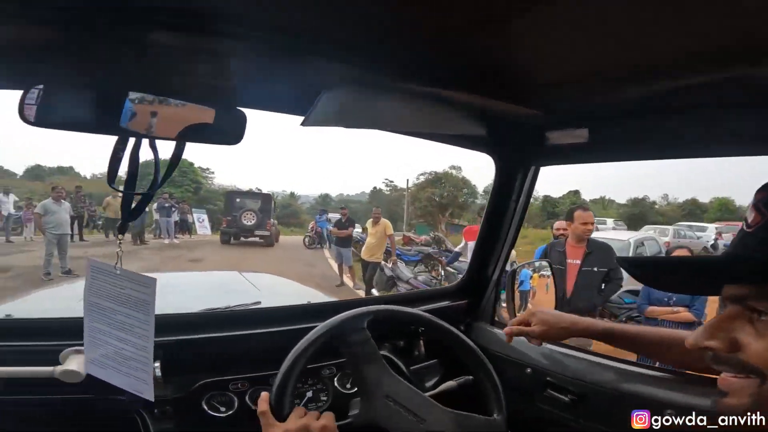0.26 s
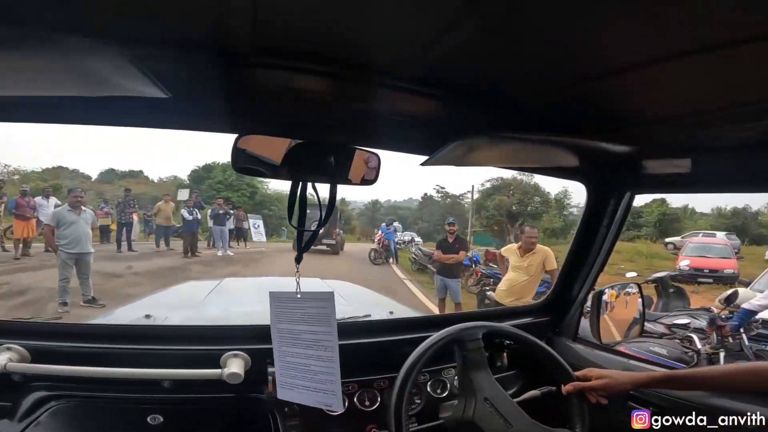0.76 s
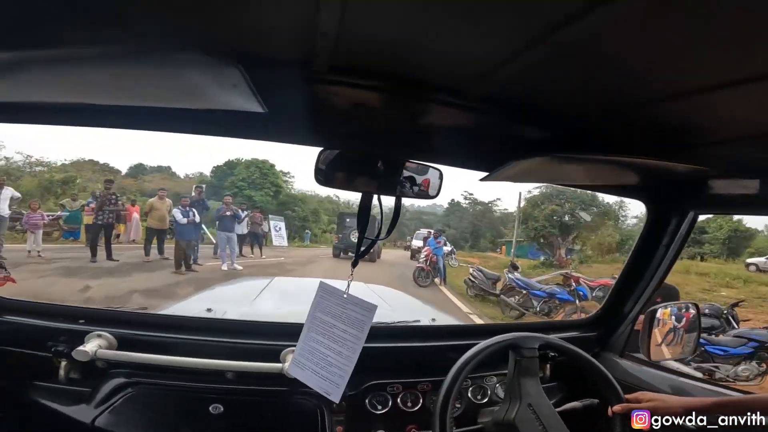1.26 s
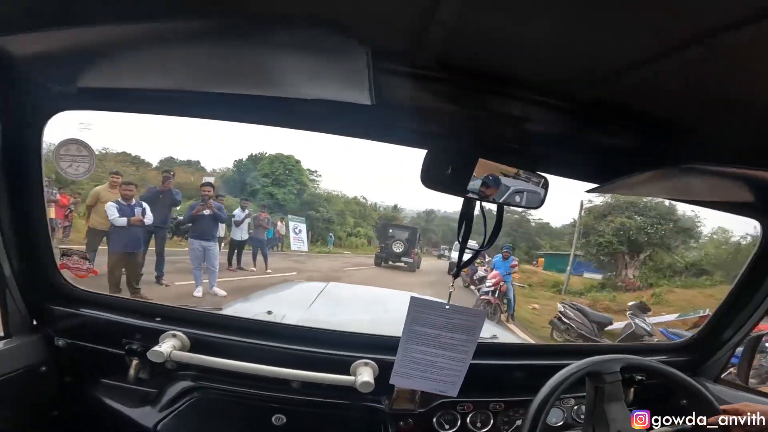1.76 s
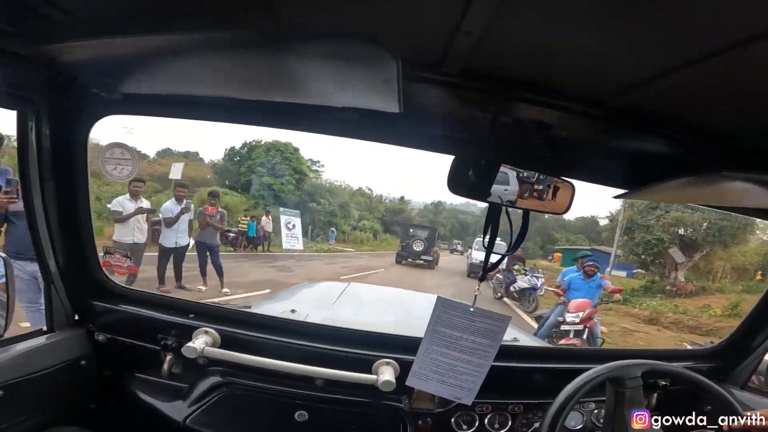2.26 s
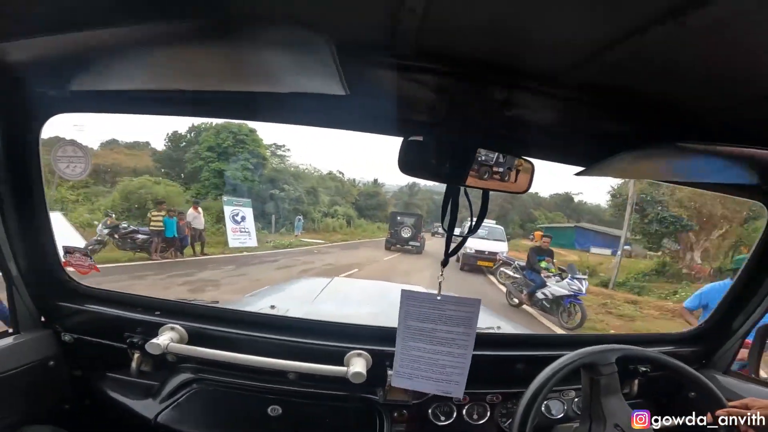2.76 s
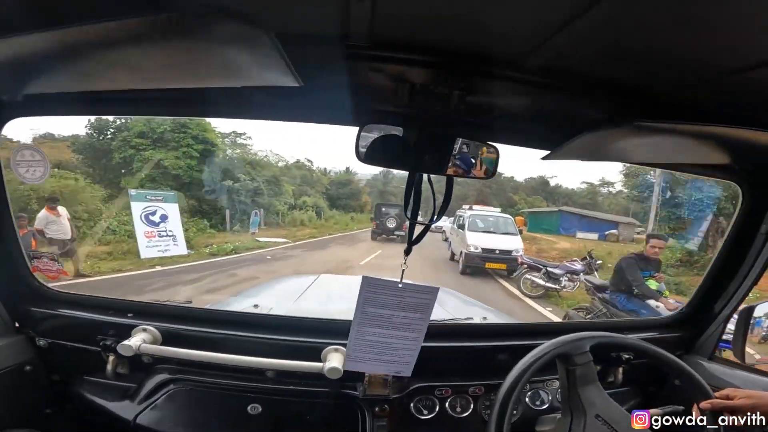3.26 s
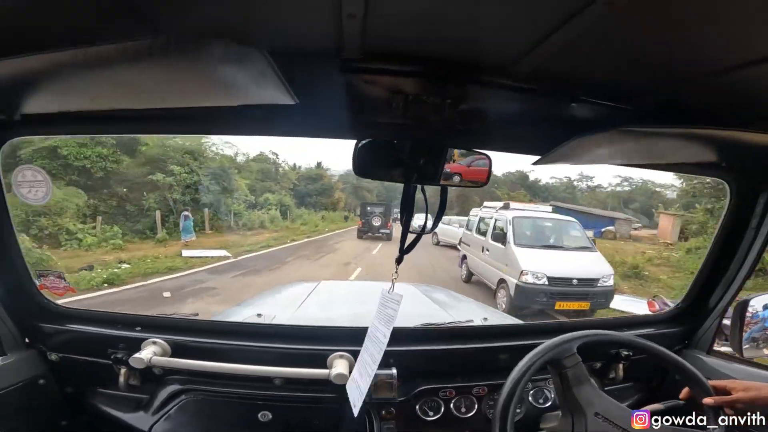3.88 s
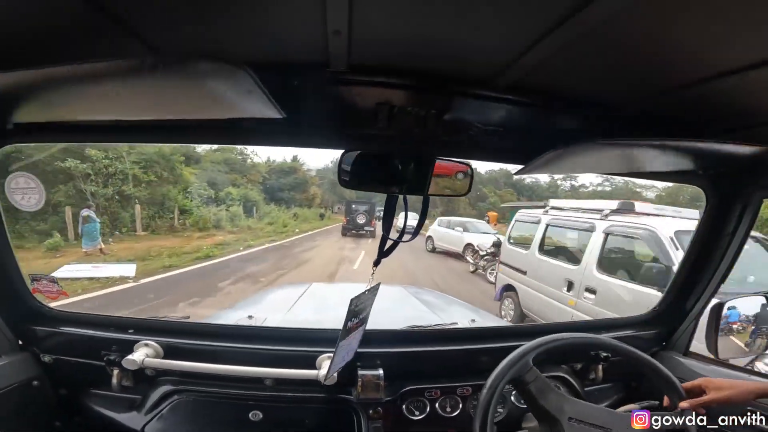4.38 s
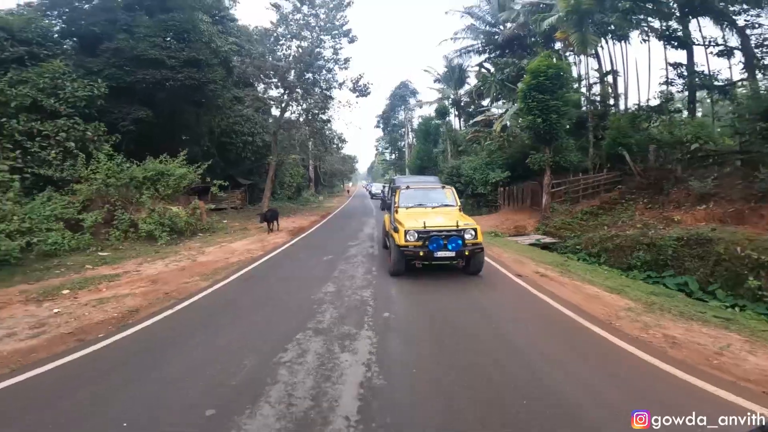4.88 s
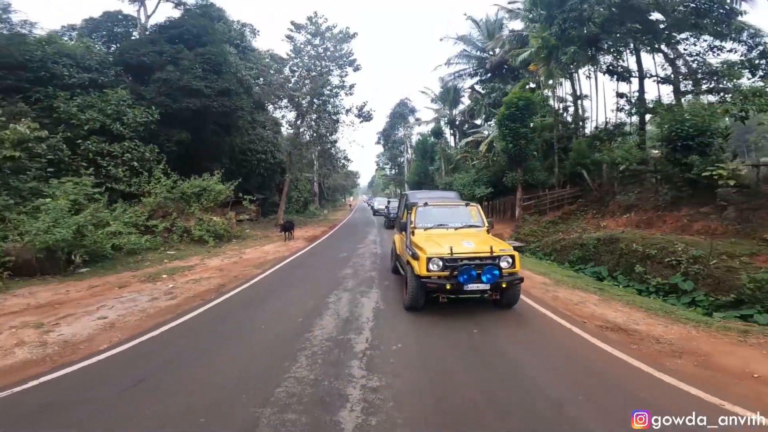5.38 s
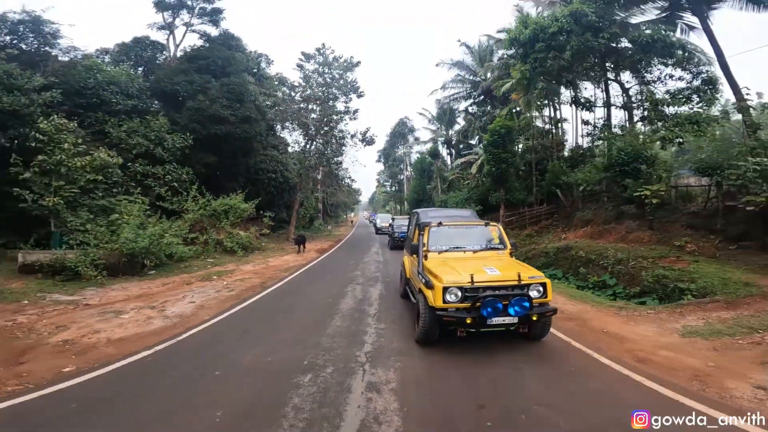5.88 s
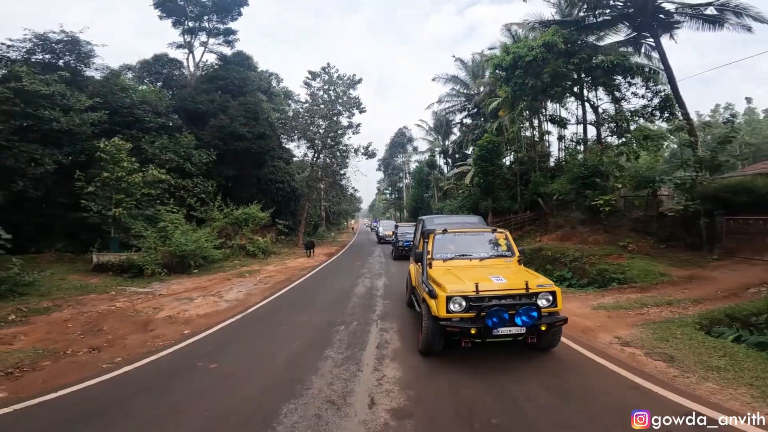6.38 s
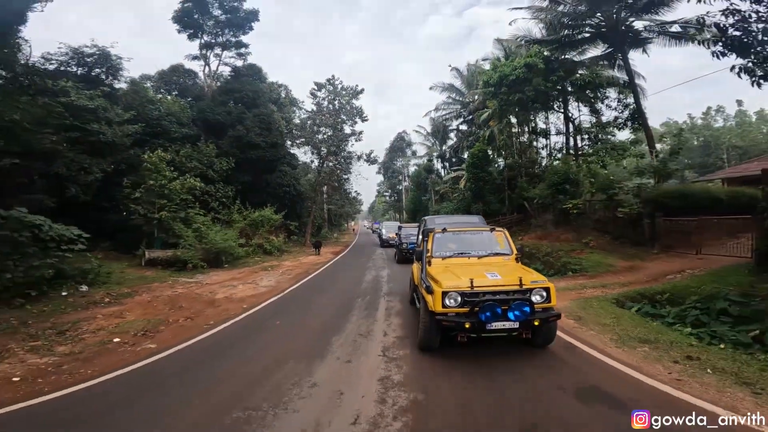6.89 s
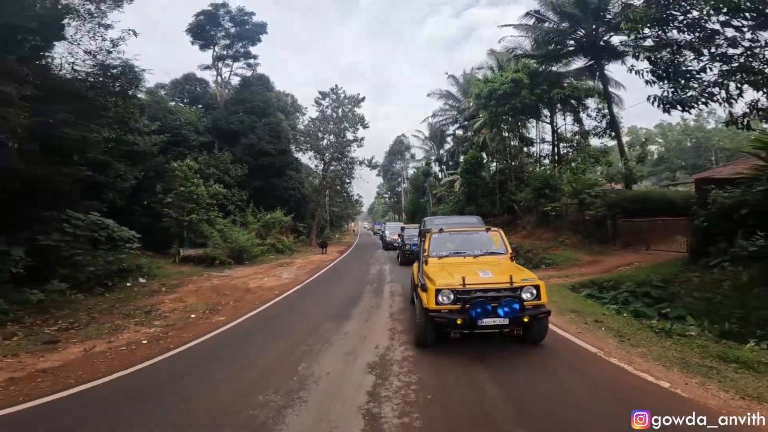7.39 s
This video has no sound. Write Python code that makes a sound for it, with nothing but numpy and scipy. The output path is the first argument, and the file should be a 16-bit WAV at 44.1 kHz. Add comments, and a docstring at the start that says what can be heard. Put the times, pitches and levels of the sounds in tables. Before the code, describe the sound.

Off-road vehicle pulls away with a droning cabin boom and clatter, stops dead, then open-road wind, tyre roar and a light rattle gradually build.

```python
"""An off-road vehicle's engine, heard inside the cab: it pulls away, revs up, sags in a gear change, pulls again.
Its firing tone booms in the cabin; firing pulses and noise ring panels, growl and clatter; trim ticks and creaks.
The cab stops dead. After an instant of silence the scene changes to the open road, heard from a moving vehicle
ahead of a convoy: a low exhaust close by and engine hums from wavering tones, air buffeting the microphone
and tyre roar from coloured noise, all swelling or shifting while a loose fitting rattles in resonant bursts."""
import sys
import numpy as np
from scipy import signal
from scipy.fft import rfft, irfft, next_fast_len
from scipy.io import wavfile
from scipy.ndimage import uniform_filter1d, map_coordinates

SR = 44100
rng = np.random.default_rng(int(sys.argv[2]) if len(sys.argv) > 2 else 0)


def wrap_up_sound(samples):
    """Save the sound to the file named by the first command line argument, as 16-bit audio."""
    columns = np.atleast_2d(samples).T
    # keep every value between -1 and 1, then stretch to whole-number steps
    tamed = np.clip(columns, -1, 1)
    steps = np.round(tamed * 32767).astype(np.int16)
    wavfile.write(sys.argv[1], SR, steps)


N = 336924
TIME = np.arange(N) / SR  # s

# In the cab. Engine speed: time_s, firing_rate_hz
ENGINE_SPEED = [(0, 51.8), (.2, 52.76), (.4, 56.64), (.52, 59.15), (.68, 60.78), (1, 67.66), (1.4, 76.26),
                (1.53, 74.4), (1.8, 61.75), (2.02, 55.15), (2.26, 48.06), (2.82, 45.26), (3.4, 50.97),
                (3.95, 51.9), (4.27, 54.14), (4.48, 59.23), (4.62, 58), (4.79, 59.76)]
# Load on the engine: time_s, load_db over a steady pull
ENGINE_LOAD = [(0, 5), (.16, 0), (.3, 0), (1, 4), (1.4, 4), (1.8, -4.5), (2.1, -5), (2.6, -0.5),
               (3.3, -1.5), (4.05, -3.5), (4.79, 4.5)]
# The boom falls away: centre_s, half_length_s, depth_db
BOOM_DIPS = [(.56, 0.081, 14), (1.39, 0.07, 21), (1.99, 0.086, 16.5), (2.38, 0.14, 4), (3.35, 0.019, 15),
             (3.83, .035, 7), (3.95, 0.93, 3), (4.24, 0.073, 4.5), (4.61, 0.083, 14)]
# The boom's octave: time_s, level_db
BOOM_OCTAVE = [(0, -24), (.47, -36), (.53, -20.5), (.66, -16), (.85, -22.5), (1.36, -22), (1.53, -42),
               (1.7, -28.5), (1.93, -33.5), (2.05, -20.5), (2.2, -29.5), (3, -35.5), (3.6, -25),
               (4.05, -31), (4.2, -19), (4.35, -37.5), (4.48, -22.5), (4.61, -20.5), (4.73, -35),
               (4.79, -19)]
# Answer of the cab's air to the third overtone: pitch_hz, level_db at a steady pull
CAB_AIR = [(135, -27.5), (150, -36), (175, -42.5), (230, -60)]
# Spectrum of the cabin's shaking: frequency_hz, relative_level_db
SHAKE_SPECTRUM = [(60, -36), (110, -1.5), (145, 11), (200, 1.5), (290, 4.5), (350, -0.5), (420, -12.5),
                  (490, -19.5), (800, -76.5)]
# The shaking swells and eases: centre_s, half_length_s, change_db
SHAKE_SWELLS = [(.15, .2, 0), (.7, 0.28, 3.5), (1.9, .45, 1.2), (2.8, .3, 0), (3.1, .1, 0.5),
                (3.65, 0.16, -5)]
# Overtones of the firings that ring in the cabin: multiple of firing rate, relative_level_db
CABIN_OVERTONES = [(2.25, -0.5), (2.5, -2.5), (4, -17), (5.3, -7), (6, -4.5), (6.9, -2.5), (9, 0.5),
                   (10.5, 0.5), (12.3, 0)]
# The cabin's response to them: frequency_hz, response_db
CABIN_RESPONSE = [(70, 5), (130, -3), (210, 0.5), (290, -1.5), (345, -5), (400, -8.5), (480, -19),
                  (590, -9), (660, -17), (740, -12), (950, -17.5), (1300, -23)]
# Resonances of the cabin panels: centre_hz, width_hz, relative_level_db
PANEL_MODES = [(604, 44, 2), (724, 16, 6), (803.6, 22, 7), (932, 52, 3), (1240, 74, -0.5), (1558, 18, 1.5),
               (1974, 55, -6.5)]
# Spectrum of the engine's growl: frequency_hz, relative_level_db
GROWL_SPECTRUM = [(280, -12), (420, 10), (480, 2.5), (590, 5.5), (667, 2), (740, 4), (900, 1), (1060, -0.5),
                  (1280, -1), (1500, -1.5), (1750, -22.5), (2600, -62.5)]
# Spectrum of the engine's clatter: frequency_hz, relative_level_db
CLATTER_SPECTRUM = [(1100, -39.5), (1600, 2), (2300, -2), (3000, -4), (3700, -12.5), (4400, -15.5),
                    (5200, -18), (6300, -23.5), (7300, -32), (8500, -33), (10500, -51), (12000, -39.5),
                    (14000, -41), (15500, -62)]
# Throaty resonances as the engine takes up the drive: centre_hz, width_hz, relative_level_db
RASP_MODES = [(644, 33, 4), (804, 95, -1), (974, 32, -1.5), (1240, 69, -4.5)]
# The drive line's drone: time_s, pitch_hz, level_db
DRIVE_LINE = [(0, 60, -40.5), (2.2, 76.56, -38), (2.65, 78.46, -29), (2.85, 78.58, -22.5),
              (3.1, 81.47, -27), (3.4, 85.58, -23), (3.65, 89.05, -24.5), (3.9, 92.9, -19),
              (4.02, 93.3, -30), (4.35, 94.5, -22), (4.8, 90.4, -33)]
# Spectrum of the chassis thumping: frequency_hz, relative_level_db
THUMP_SPECTRUM = [(10, -10.5), (22, 1.5), (32, -4), (45, 2.5), (80, 3), (130, -0.5), (200, -16),
                  (400, -89.5)]
# Rougher and smoother stretches of road: centre_s, half_length_s, change_db of thumping
ROAD_BUMPS = [(.4, 0.64, -3), (1.45, 0.17, 5.5), (2.5, 0.17, 3.5), (4.6, 0.32, 4.5)]
# Ticks, buzzes, creaks and squeaks of trim: start_s, level_db before its envelope, centre_hz, width_hz, t60_s
TRIM_BURSTS = [(.01, -53.5, 4980, 40.7, 0.75), (.01, -46, 3620, 45, .8), (1.965, -42, 4000, 995, 0.076),
               (1.969, -57, 6940, 605, 0.082), (3.435, -62.5, 13160, 1297, 0.051),
               (3.437, -58.5, 8700, 995, 0.062), (2.37, -29, 510, 260, 0.24), (3.05, -25, 320.9, 40, 0.26),
               (3.19, -21.5, 325, 40, 0.14), (3.639, -25, 599.3, 70, 0.15), (3.775, -51.5, 4800, 109, 0.23),
               (3.815, -50, 4630, 128.3, 0.2)]
# The engine sings at full throttle: multiple of firing rate, relative_level_db
WHINE_OVERTONES = [(8.25, -4.5), (10.27, 5.5), (11.5, -8.5), (12.3, -11), (13.05, -6.5), (13.7, -16),
                   (14.3, 4), (17.95, -5.5), (19.08, 3.5), (20, -3.5)]
# Bands of the thin hiss: centre_hz, width_hz, relative_level_db
HISS_BANDS = [(2850, 70, -6.5), (3180, 180, 3.5), (3400, 110, -6.5)]

# On the open road. Spectrum of air on the microphone: frequency_hz, relative_level_db
BUFFET_SPECTRUM = [(8, -16), (25, -19.5), (45, 0.5), (85, 4.5), (125, -8.5), (200, -45), (400, -80.5)]
# Spectrum of the road noise's low body: frequency_hz, relative_level_db
BODY_SPECTRUM = [(65, -26.5), (110, 1), (160, 2), (220, 0.5), (265, -7.5), (365, -9.5), (400, -13),
                 (440, -12.5), (520, -27), (750, -75)]
# Spectrum of the tyres' roar: frequency_hz, relative_level_db
TYRE_SPECTRUM = [(280, -28), (480, -1), (575, -0.5), (720, -2.5), (805, -1), (900, -2), (1150, -5.5),
                 (1300, -4.5), (1440, -2), (1620, -5.5), (2100, -8), (2430, -11.5), (2950, -10),
                 (3400, -23.5), (4600, -51.5)]
# Spectrum of the fine treble spray: frequency_hz, relative_level_db
SPRAY_SPECTRUM = [(2300, -30.5), (3200, 2.5), (3900, -2.5), (4500, -4.5), (5200, -7), (6000, -12.5),
                  (7000, -18), (8300, -22.5), (9200, -29), (10500, -61), (12500, -38.5), (15000, -33.5)]
# The leading vehicle's exhaust: time_s, firing_rate_hz, level_db, octave_level_db
EXHAUST_SPEED = [(4.85, 24.64, -43.5, -51), (5.7, 24.27, -35, -38), (6.4, 24.54, -32.5, -39),
                 (6.66, 26.27, -28, -42), (6.82, 29.1, -33, -25.5), (6.96, 30.2, -26.5, -21),
                 (7.13, 33.83, -24, -41), (7.27, 36.7, -27, -22), (7.48, 35.88, -25, -20),
                 (7.64, 38, -28, -32)]
# The exhaust's upper overtones: multiple of firing rate, relative_level_db
BURBLE_OVERTONES = [(3, -5), (4, 0.5), (5, -5), (6, -5.5), (7, -6), (9, -12.5)]
# The convoy's engines: time_s, pitch_hz, level_db
CONVOY_HUM = [(4.9, 81.44, -38), (5.1, 83.7, -41.5), (5.4, 84.24, -39.5), (5.8, 81.17, -55),
              (6.35, 81.27, -49), (6.55, 80.63, -31), (7, 78.9, -29.5), (7.2, 82.1, -42), (7.6, 83, -36)]
# A steady-pitched low drone under the convoy: time_s, level_db
ROAD_DRONE = [(5.2, -45), (5.8, -36), (6.4, -36.5), (7.1, -26), (7.64, -25)]
# Hum of tyre tread: time_s, pitch_hz
TREAD_PITCH = [(4.85, 216), (5.7, 229.6), (7.35, 228.2), (7.64, 209.7)]
# The leading vehicle's transmission sings: pitch_hz, level_db before the swell
GEAR_TONES = [(399, -56.5), (578, -68.5), (798, -65), (2480, -76)]
# Modes of the loose fitting, lowest first: centre_hz, width_hz, relative_level_db
FITTING_MODES = [(2990, 130, 1), (3860, 100, 11), (5000, 220, -3), (6630, 240, -16), (8060, 170, -20),
                 (8350, 170, -20.5), (9200, 250, -28.5)]
# The fitting trembles harder: centre_s, half_length_s, extra_db
TREMBLES = [(5.65, 0.2, 9), (6.9, .4, 3)]
# The fitting knocks, levels before the envelope: start_s, lowest_mode_db, upper_modes_db, click_db
KNOCKS = [(5.478, -49, -53, -64.5), (5.58, -50, -46, -61), (5.684, -54, -51.5, -58),
          (5.793, -45.5, -51, -63), (6.025, -48, -60, -52), (6.153, -55, -57, -59), (6.288, -62, -53, -64),
          (6.599, -58, -49, -56), (6.763, -57, -49, -58), (6.935, -57, -47, -55.5),
          (7.111, -56, -44.5, -53), (7.291, -48, -40, -43.5), (7.477, -53, -48, -48.5)]
# Spectrum of the dry click: frequency_hz, relative_level_db
CLICK_SPECTRUM = [(1500, -7.5), (3500, 8), (6500, -2.5), (8000, -2.5), (9500, -15.5), (11000, -39),
                  (15000, -32)]

# Each _GROWS of the cab is in dB per dB of load, its _DB the level at a steady pull
BOOM_DB, AIR_GROWS = -14.5, 0.55  # the boom outside its dips
SHIFT_S = 2.1  # from here, in the higher gear, the engine can labour
LUG_HZ, LUG_WIDTH_HZ, LUG_ROUGH = 49, 7.7, 0.078  # it labours around this firing rate; share of stumbling
SHAKE_DB, SHAKE_GROWS = -32.5, 0.24  # before pull, bumps and swells
BUMP_SHAKE = 0.74  # dB of cabin shake per dB of thumping
OVERTONE_DB = -35.5  # while the engine pulls, before the cabin's shake changes
COAST_HZ_PER_S, COAST_DB = 14, 12  # fall of firing rate with the throttle shut; the overtones' loss
GROWL_DB, GROWL_GROWS = -34, 0.88
CLATTER_DB, CLATTER_GROWS = -43, 1
PULL_START_S, PULL_END_S, PULL_RAMP_S = 0.42, 1.395, 0.12  # the throttle is held wide open
PULL_FAN_DB, PULL_SHAKE_DB = 15, 0.5  # what that adds to the fan and the cabin's shaking
FAN_DB = -51.5  # at light throttle, off resonance
FAN_PEAK_HZ, FAN_WIDTH_HZ, FAN_PEAK_DB = 348.3, 25, 12  # the panel that the fan's tone rings
RASP_DB, RASP_S, RASP_LENGTH_S = -34.5, 0.1, 0.17  # peak level, centre, half length
CHASSIS_DB = -23.5  # thumping between bumps
TRIM_RISE = 0.11  # rise time of a burst as a share of its t60
WHINE_DB = -49.5  # reference for its overtones at wide open throttle
HISS_DB, HISS_S, HISS_LENGTH_S = -47.5, 2.6, 0.16  # peak level, centre, half length
HISS_SKIRT_S, HISS_SKIRT_SHARE = 0.55, 0.36  # half length and share of its fainter, longer skirt

CUT_S, CUT_LENGTH_S = 4.793, .00005  # the cab ends
FADE_S, FADE_LENGTH_S, FADE_POWER = 4.835, 0.29, 1.5  # the open road fades in
SWELL_S, SWELL_DB_PER_S = 5.426, 6  # road noise grows from here as the vehicle gathers speed
# Each _GROWS of the road is in dB per dB of swell, its _DB the level before the swell
BUFFET_DB, BUFFET_GROWS, BUFFET_TOP_DB = -38, 1.74, -24.5  # the last is a ceiling
BODY_DB, TYRE_DB, SPRAY_DB = -38.5, -50, -62
BURBLE_DB, BURBLE_GROWS = -55, 1.66  # reference for its overtones
ROAD_DRONE_HZ, TREAD_DB = 46.3, -48.5
CHATTER_DB, CHATTER_SWING_DB, CHATTER_RATE = -75.5, 2, 22  # base level, uneven swing, knots per s
RATTLE_T60_S, RATTLE_RISE_S = 0.085, 0.0017
TOP_HZ = 15650  # band limit at the microphone


def amp(db):
    """Decibels to gain."""
    return 10 ** (np.asarray(db) / 20)


def unit(x):
    """Scale to rms 1."""
    return x / np.sqrt(np.mean(x ** 2) + 1e-20)


def curves(rows):
    """One value per sample for each column after the time."""
    s, *columns = np.transpose(rows)
    return [np.interp(TIME, s, column) for column in columns]


def bell(x, centre, width):
    """A smooth hump of height 1."""
    return np.exp(-((x - centre) / width) ** 2)


def humps(rows):
    """Sum of smooth humps in time: centre_s, half_length_s, height_db."""
    return sum(db * bell(TIME, s, length) for s, length, db in rows)


def noise():
    """Fresh white noise."""
    return rng.standard_normal(N)


def wobble(rate):
    """A smooth random curve, rate knots a second."""
    knots = rng.standard_normal(int(N * rate / SR) + 4)
    return map_coordinates(knots, [TIME * rate])


def filtered(x, response):
    """x times a complex response of frequency."""
    m = next_fast_len(N + SR // 2)
    return irfft(rfft(x, m) * response(np.fft.rfftfreq(m, 1 / SR)), m)[:N]


def coloured(x, points):
    """x through a frequency_hz, level_db spectrum, at rms 1."""
    f, db = np.transpose(points)
    return unit(filtered(x, lambda hz: amp(np.interp(np.log(hz + 1), np.log(f), db))))


def resonate(x, modes):
    """x through centre_hz, width_hz, level_db resonances with steep skirts, at rms 1."""
    def peak(hz, centre, width):
        return 1j * hz * width / (centre * centre - hz * hz + 1j * hz * width)

    def response(hz):
        # squaring steepens the skirts; 1.6 makes up for the narrowing
        return sum(amp(db) * peak(hz, centre, 1.6 * width) ** 2 for centre, width, db in modes)

    return unit(filtered(x, response))


def patchy(depth_db):
    """Noise with patches of random gain in time and frequency."""
    z = signal.stft(noise(), nperseg=1024)[2]
    field = uniform_filter1d(rng.standard_normal(z.shape), size=6, axis=0)
    field = uniform_filter1d(field, size=9, axis=1)
    return signal.istft(z * amp(depth_db * unit(field)), nperseg=1024)[1][:N]


def angle(hz):
    """Running phase of something that turns at hz."""
    return 2 * np.pi * np.cumsum(hz) / SR


def hum(phase, rough, rate):
    """A tone of rms 1 whose strength and phase waver."""
    in_phase = (1 + rough * wobble(rate)) * np.sin(phase)
    return unit(in_phase + rough * wobble(rate) * np.cos(phase))


def firings(phase, uneven_db, scatter_db):
    """One impulse per firing; each of four cylinders has its own strength."""
    at = np.flatnonzero(np.diff(phase // (2 * np.pi)))
    cylinder = np.array([1, -1, 0, -.5])[np.arange(len(at)) % 4]
    pulses = np.zeros(N)
    pulses[at] = amp(uneven_db * cylinder + scatter_db * rng.standard_normal(len(at)))
    return unit(pulses)


def engine_in_cab():
    """All engine sounds follow one firing phase; shake, third overtone, growl and clatter grow with load."""
    hz, = curves(ENGINE_SPEED)
    load_db, = curves(ENGINE_LOAD)
    phase = angle(hz)
    pull = np.clip(np.minimum(TIME - PULL_START_S, PULL_END_S - TIME) / PULL_RAMP_S, 0, 1)
    cabin_db = PULL_SHAKE_DB * pull + BUMP_SHAKE * humps(ROAD_BUMPS) + humps(SHAKE_SWELLS)
    cabin = amp(cabin_db) * (shake(phase, load_db) + overtones(hz, phase))
    combustion = growl(phase, load_db) + clatter(phase, load_db)
    return (boom(hz, phase, load_db) + cabin + combustion + fan(hz, phase, pull)
            + rasp(phase) + whine(phase, pull) + hiss(phase))


def boom(hz, phase, load_db):
    """The firing tone fills the cab and stumbles when it labours; its low overtones swell and fade."""
    rough = 0.04 + LUG_ROUGH * (TIME > SHIFT_S) * bell(hz, LUG_HZ, LUG_WIDTH_HZ)
    firing = amp(BOOM_DB - humps(BOOM_DIPS)) * hum(phase, rough=rough, rate=30)
    octave = amp(curves(BOOM_OCTAVE)[0]) * hum(2 * phase, rough=.12, rate=12)
    third_db = np.interp(3 * hz, *np.transpose(CAB_AIR)) + AIR_GROWS * load_db
    return firing + octave + amp(third_db) * hum(3 * phase, rough=.22, rate=14)


def shake(phase, load_db):
    """Uneven firing impulses and noise shake the cabin."""
    drive = firings(phase, uneven_db=7.5, scatter_db=2.0) + noise()
    return amp(SHAKE_DB + SHAKE_GROWS * load_db) * coloured(drive, SHAKE_SPECTRUM)


def coasting(hz):
    """0 while the engine speed holds or rises, 1 while it falls freely."""
    slowing = -uniform_filter1d(np.gradient(hz) * SR, size=8000)
    return np.clip(slowing / COAST_HZ_PER_S, 0, 1)


def overtones(hz, phase):
    """Wavering overtones, some at broken multiples, cross the cabin's response and fade with a shut throttle."""
    stack = np.zeros(N)
    for multiple, db in CABIN_OVERTONES:
        offset = rng.uniform(0, 2 * np.pi)
        stack += amp(db) * hum(multiple * phase + offset, rough=.6, rate=13)
    return amp(OVERTONE_DB - COAST_DB * coasting(hz)) * coloured(stack, CABIN_RESPONSE)


def growl(phase, load_db):
    """Combustion noise comes in one puff per firing, alternately strong and weak, and rings the panels."""
    puffs = amp(0.47 * np.cos(phase) + 0.49 * np.cos(phase / 2))
    drive = firings(phase, uneven_db=-1.5, scatter_db=4.0) + 1.3 * puffs * noise()
    panels = resonate(drive, PANEL_MODES)
    throat = coloured(puffs * patchy(depth_db=1.5), GROWL_SPECTRUM)
    return amp(GROWL_DB + GROWL_GROWS * load_db) * (amp(-4.0) * throat + amp(-7.5) * panels)


def clatter(phase, load_db):
    """Bright, patchy mechanical noise pulses gently with the firings."""
    pulsing = amp(0.54 * np.cos(phase)) * patchy(depth_db=1.0)
    return amp(CLATTER_DB + CLATTER_GROWS * load_db) * coloured(pulsing, CLATTER_SPECTRUM)


def fan(hz, phase, pull):
    """The belt-driven fan sings at a fixed ratio to the firing rate, louder where it meets a panel's resonance."""
    ratio = 4.72
    db = FAN_DB + PULL_FAN_DB * pull + FAN_PEAK_DB * bell(ratio * hz, FAN_PEAK_HZ, FAN_WIDTH_HZ)
    tone = hum(ratio * phase, rough=0.55, rate=34)
    octave = amp(-27.5) * hum(2 * ratio * phase, rough=0.44, rate=4.0)
    return amp(db) * (tone + octave)


def rasp(phase):
    """Puffs at the firing rate ring throaty resonances as the vehicle moves off."""
    puffs = amp(3 * np.cos(phase)) * noise()
    return amp(RASP_DB) * bell(TIME, RASP_S, RASP_LENGTH_S) * resonate(puffs, RASP_MODES)


def running_gear():
    """The drive line drones as a wavering tone and the chassis thumps over the road as low noise."""
    hz, db = curves(DRIVE_LINE)
    drone = amp(db) * hum(angle(hz), rough=.2, rate=16)
    return drone + amp(CHASSIS_DB + humps(ROAD_BUMPS)) * coloured(noise(), THUMP_SPECTRUM)


def trim():
    """Loose trim gives decaying bursts, each in its own band of noise; long ones also rise more slowly."""
    out = np.zeros(N)
    for s, db, hz, width_hz, t60 in TRIM_BURSTS:
        age = np.maximum(TIME - s, 0) / t60
        envelope = amp(db - 60 * age) * (1 - np.exp(-age / TRIM_RISE))
        out += envelope * resonate(noise(), [(hz, width_hz, 0)])
    return out


def whine(phase, pull):
    """Rough high overtones glide with the revs while the throttle is wide open."""
    stack = sum(amp(db) * hum(multiple * phase, rough=.8, rate=30) for multiple, db in WHINE_OVERTONES)
    return amp(WHINE_DB) * pull * stack


def hiss(phase):
    """A thin whirring hiss, roughened by the firings, peaks briefly and lingers faintly either side."""
    peak = (1 - HISS_SKIRT_SHARE) * bell(TIME, HISS_S, HISS_LENGTH_S)
    skirt = HISS_SKIRT_SHARE * bell(TIME, HISS_S, HISS_SKIRT_S)
    flutter = amp(3 * np.cos(phase) + 1.5 * wobble(25))
    return amp(HISS_DB) * (peak + skirt) * unit(flutter * resonate(noise(), HISS_BANDS))


def road(swell_db):
    """Air buffets the microphone and tyres roar on the asphalt: coloured noise that grows with the swell."""
    buffet_db = np.minimum(BUFFET_DB + BUFFET_GROWS * swell_db, BUFFET_TOP_DB)
    air = amp(buffet_db) * coloured(noise(), BUFFET_SPECTRUM)
    body = amp(BODY_DB) * coloured(patchy(depth_db=1.5), BODY_SPECTRUM)
    tyres = amp(TYRE_DB) * coloured(patchy(depth_db=1.0), TYRE_SPECTRUM)
    spray = amp(SPRAY_DB) * coloured(patchy(depth_db=0.9), SPRAY_SPECTRUM)
    return air + amp(swell_db) * (body + tyres + spray)


def exhaust(swell_db):
    """A slow exhaust beats close by; its upper overtones emerge as it pulls harder."""
    hz, firing_db, octave_db = curves(EXHAUST_SPEED)
    phase = angle(hz)
    firing = amp(firing_db) * hum(phase, rough=0.3, rate=10)
    octave = amp(octave_db) * hum(2 * phase, rough=0.15, rate=6.8)
    burble = sum(amp(db) * hum(multiple * phase, rough=.45, rate=9) for multiple, db in BURBLE_OVERTONES)
    return firing + octave + amp(BURBLE_DB + BURBLE_GROWS * swell_db) * burble


def convoy():
    """The following engines hum over a low drone of steady pitch."""
    hz, db = curves(CONVOY_HUM)
    engines = amp(db) * hum(angle(hz), rough=0.2, rate=4.9)
    drone = hum(2 * np.pi * ROAD_DRONE_HZ * TIME, rough=.2, rate=6)
    return engines + amp(curves(ROAD_DRONE)[0]) * drone


def tread_and_gears(swell_db):
    """Tyre tread hums at a drifting pitch and the transmission sings at fixed, very unsteady ones."""
    tread = amp(TREAD_DB) * hum(angle(curves(TREAD_PITCH)[0]), rough=0.29, rate=5.4)
    gears = sum(amp(db) * hum(2 * np.pi * hz * TIME, rough=0.93, rate=16) for hz, db in GEAR_TONES)
    return amp(swell_db) * (tread + gears)


def chatter():
    """The loose fitting trembles faintly and unevenly in its three lowest modes, under its knocks."""
    db = CHATTER_DB + humps(TREMBLES) + CHATTER_SWING_DB * wobble(CHATTER_RATE)
    return amp(db) * resonate(noise(), FITTING_MODES[:3])


def rattles():
    """Each knock is a short burst of noise ringing the fitting's modes in its own mix, with a dry click."""
    lowest = resonate(noise(), FITTING_MODES[:1])
    upper = resonate(noise(), FITTING_MODES[1:])
    parts = np.array([lowest, upper, coloured(noise(), CLICK_SPECTRUM)])
    out = np.zeros(N)
    for s, *mix_db in KNOCKS:
        age = np.maximum(TIME - s, 0)
        envelope = amp(-60 * age / RATTLE_T60_S) * (1 - np.exp(-age / RATTLE_RISE_S))
        out += envelope * (amp(mix_db) @ parts)
    return out


def scene():
    """The cab stops dead; after an instant of silence the open road fades in and swells."""
    cab_gate = np.clip((CUT_S - TIME) / CUT_LENGTH_S, 0, 1)
    cab = cab_gate * (engine_in_cab() + running_gear() + trim())
    fade = np.clip((TIME - FADE_S) / FADE_LENGTH_S, 0, 1) ** FADE_POWER
    swell_db = SWELL_DB_PER_S * np.maximum(TIME - SWELL_S, 0)
    vehicles = exhaust(swell_db) + convoy() + tread_and_gears(swell_db)
    open_road = road(swell_db) + vehicles + chatter() + rattles()
    return (cab + fade * open_road)[None]


def record(dry):
    """The single microphone channel keeps nothing at or above its band limit."""
    return filtered(dry[0], lambda hz: hz < TOP_HZ)[None]


dry = scene()
out = record(dry)
wrap_up_sound(out)
```